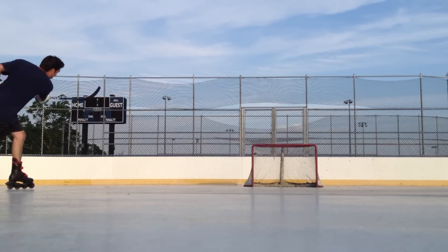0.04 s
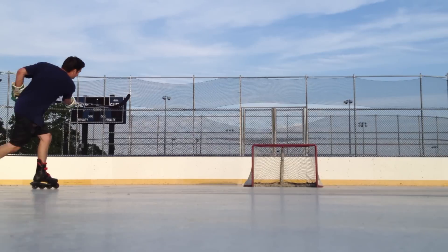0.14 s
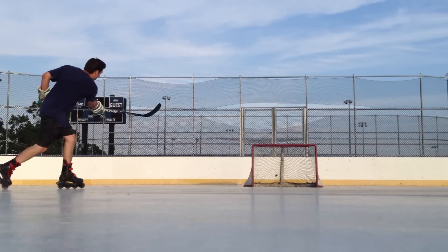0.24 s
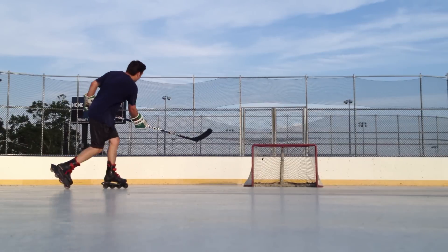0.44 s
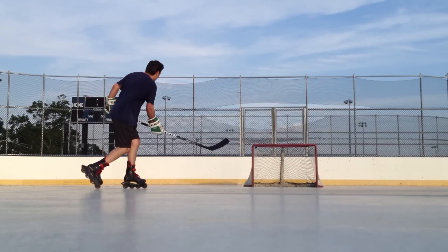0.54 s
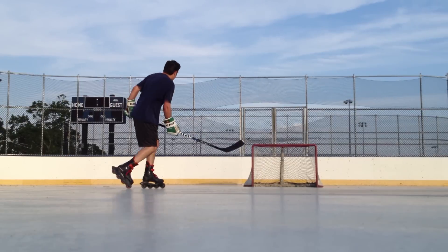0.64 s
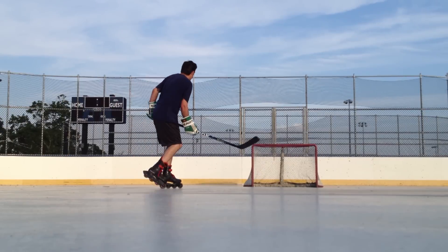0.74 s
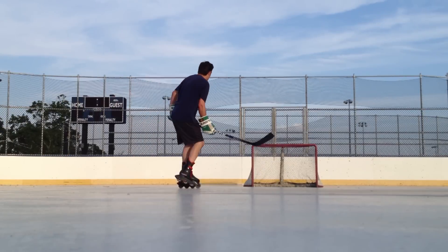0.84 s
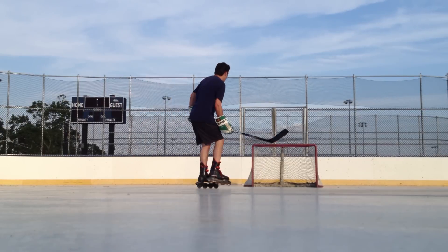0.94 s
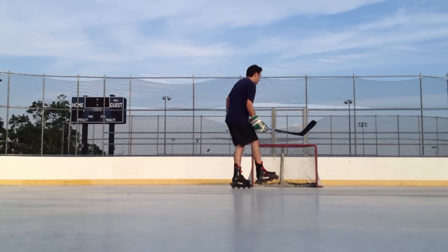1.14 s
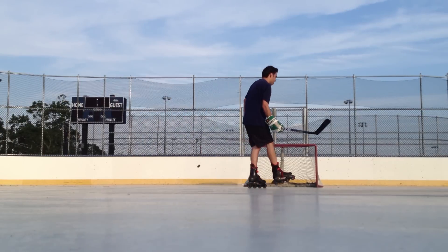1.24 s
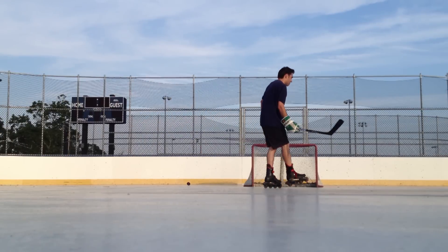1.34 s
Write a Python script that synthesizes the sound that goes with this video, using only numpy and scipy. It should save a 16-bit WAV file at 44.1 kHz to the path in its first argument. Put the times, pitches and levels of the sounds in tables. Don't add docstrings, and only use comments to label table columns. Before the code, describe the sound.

Sharp metallic clang of a puck striking a goal post, with board echoes fading over faint traffic

```python
import sys
import numpy as np
from scipy import signal
from scipy.io import wavfile

SR = 44100
rng = np.random.default_rng(int(sys.argv[2]) if len(sys.argv) > 2 else 0)


def output_pcm(signal):
    pcm = np.clip(np.atleast_2d(signal).T, -1, 1) * 32767
    wavfile.write(sys.argv[1], SR, np.round(pcm).astype(np.int16))


def magnitude_from_level(level_db):
    exponent = np.asarray(level_db, float) / 20
    return 10 ** exponent


N = 61739


def post():
    blow_s = [
        .2451,
        .2463,
        .2468,
    ]
    blow_db = [
        -18,
        -9,
        -8,
    ]
    blow = clicks(blow_s, blow_db)
    main_contact = clicks(blow_s[1:2], [0])
    rebound_push = -clicks(blow_s[2:], [15.5])
    struck = tubes(main_contact) + crack(blow, rebound_push) + crack_echo(main_contact)
    return filtered(struck, 2, 200, "high")


def tubes(contact):
    post_hz = [903, 950, 1147, 1485, 1805, 1922, 2003, 2190, 2259, 2552, 2633, 3102, 3305, 5846]
    # level_db, t60_s
    post_modes = [(0, .22), (0, .25), (-5, .3), (-1, .2), (1, .25), (-1, .2), (1, .25), (-6, .2), (-7, .18),
                  (-8, .2), (-6, .22), (-11, .15), (-9, .22), (-19, .18)]
    bar_hz = [1440, 1594, 2128, 2310, 2774, 3145, 3876, 4150, 6191, 6600, 7257, 7806]
    # level_db, t60_s
    bar_modes = [(-9, .2), (-11, .2), (-9, .15), (-7, .18), (-11, .14), (-9, .18), (-15, .14), (-16, .08),
                 (-21, .12), (-20, .04), (-25, .12), (-24, .12)]
    direct_db, tube_db = 3, -34
    heard = magnitude_from_level(direct_db) * contact + rink(contact, [(100, 0.0045), (15500, 0)])
    total = np.zeros(N)
    for hz, (db, t60) in zip(post_hz + bar_hz, post_modes + bar_modes):
        total += magnitude_from_level(tube_db + db) * rms_one(ring(heard, hz, t60))
    return filtered(total, 2, 600, "high")


def crack(blow, push):
    # freq_hz, level_db
    burst_colour = [
        (100, -46),
        (300, -15),
        (700, -1),
        (1100, -9),
        (2400, -16),
        (3000, 5),
        (6500, -8),
        (15500, -40),
    ]
    burst_t60_s, burst_db, snap_db = 0.0042, 8, -32
    noise = rms_one(bands(lambda hz: magnitude_from_level(at_hz(burst_colour, hz))))
    burst = noise * magnitude_from_level(-60 * np.arange(N) / SR / burst_t60_s)
    snap = filtered(blow, 2, 5000, "low")
    thump = filtered(push, 2, 970, "low")
    return magnitude_from_level(snap_db) * snap + thump + magnitude_from_level(burst_db) * signal.fftconvolve(blow, burst)[:N]


def crack_echo(contact):
    # freq_hz, level_db
    echo_colour = [
        (200, -18),
        (500, -8),
        (850, -4),
        (1300, -0.5),
        (2400, 0),
        (3000, -6.5),
        (6500, -14.5),
        (15500, -50),
    ]
    return magnitude_from_level(20.5) * rink(contact, echo_colour)


def rink(x, colour):
    # delay_s, rise_s, fall_t60_s, level_db
    boards = [
        (.002, 0.0021, 0.36, -24.5),
        (0.033, 0.011, 0.43, -25),
        (.17, 0.039, 1, -45),
        (0.328, 0.043, 0.94, -48),
        (.66, 0.023, 1, -62.5),
    ]
    # freq_hz, loss_db_per_s
    air = [
        (150, 7),
        (500, 10.5),
        (1200, -1.5),
        (2600, -0.5),
        (3300, 9),
        (6500, 34),
        (12000, 64),
    ]
    t = np.arange(N) / SR
    power = np.zeros(N)
    for delay, rise, t60, db in boards:
        fall_db = 120 * np.maximum(t - delay - rise, 0) / t60
        power += magnitude_from_level(2 * db - fall_db) * np.clip((t - delay) / rise, 0, 1) ** 2
    scatter = bands(lambda hz: magnitude_from_level(at_hz(colour, hz) - at_hz(air, hz) * t))
    scatter = scatter * magnitude_from_level(1 * drift(120))
    return signal.fftconvolve(x, np.sqrt(power) * scatter)[:N]


def shot_echo():
    # time_s, level_db
    slap_tail = [
        (0, -39),
        (.03, -46),
        (0.053, -46),
        (.06, -40),
        (.075, -45.5),
        (.11, -41.5),
        (.13, -43),
        (.19, -47),
        (.225, -44),
    ]
    # freq_hz, level_db
    slap_colour = [
        (200, -42),
        (330, -11),
        (600, 6),
        (1200, 15.5),
        (2200, 13),
        (4000, 5),
        (8000, -9),
        (15500, -21),
    ]
    t60_s = 3.6
    t = np.arange(N) / SR
    tail_s, tail_db = np.transpose(slap_tail)
    level_db = np.interp(t, tail_s, tail_db) - 60 * np.maximum(t - tail_s[-1], 0) / t60_s
    noise = rms_one(bands(lambda hz: magnitude_from_level(at_hz(slap_colour, hz) + 1.0 * drift(25))))
    slap = magnitude_from_level(level_db + 2 * drift(250)) * noise
    return filtered(slap, 3, 300, "high")


def ticks():
    # start_s, peak_db
    tick_list = [(0.0014, -33.5), (0.0244, -36), (0.0588, -36), (0.0977, -33), (0.1154, -37), (0.1744, -57),
                 (0.3564, -24), (0.4234, -25), (0.4644, -44), (0.7024, -46), (0.7148, -40), (1.1707, -62),
                 (1.2181, -67.5), (1.3094, -42), (1.3344, -43)]
    t60_s, snaps_db = 0.037, -10
    hits = np.abs(clicks(*np.transpose(tick_list)))
    envelope = signal.lfilter([1], [1, -magnitude_from_level(-60 / (t60_s * SR))], hits)
    snaps = filtered(envelope * rng.standard_normal(N), 2, [2500, 10000], "band")
    thud = ring(clicks([0.062], [-44]), 328, 0.041)
    return magnitude_from_level(snaps_db) * snaps + thud


def traffic():
    # freq_hz, level_db
    hum_colour = [(40, -81), (130, -2), (200, -7), (400, -7), (900, -3.5), (2000, -8), (5000, -21),
                  (15500, -31)]
    hum = bands(lambda hz: magnitude_from_level(at_hz(hum_colour, hz) + 2 * drift(10)))
    return magnitude_from_level(-54) * rms_one(hum)


def ring(x, hz, t60):
    r, w = magnitude_from_level(-60 / (t60 * SR)), 2 * np.pi * hz / SR
    return signal.lfilter([0, np.sin(w)], [1, -2 * r * np.cos(w), r * r], x)


def clicks(s, db):
    out = np.full(N, 1e-18)
    out[(np.array(s) * SR).astype(int)] = magnitude_from_level(np.array(db)) * (-1) ** np.arange(len(s))
    return out


def bands(gain):
    edges_hz = 35 * 2 ** np.arange(0, 9.1, 1 / 3)
    white = rng.standard_normal((2, N))
    total = np.zeros(N)
    for k, (lo, hi) in enumerate(zip(edges_hz, edges_hz[1:])):
        total += gain(np.sqrt(lo * hi)) * filtered(white[k % 2], 2, [lo, hi], "band")
    return total


def drift(rate):
    r = np.exp(-2 * np.pi * rate / SR)
    wander = signal.lfilter([1], [1, -2 * r, r * r], rng.standard_normal(N + 9000))
    return rms_one(wander[9000:])


def filtered(x, order, hz, kind):
    return signal.sosfilt(signal.butter(order, hz, kind, fs=SR, output="sos"), x)


def at_hz(points, hz):
    freq_hz, level_db = np.array(points).T
    return np.interp(np.log(hz), np.log(freq_hz), level_db)


def rms_one(x):
    return x / np.sqrt(np.mean(x ** 2) + 1e-20)


def scene():
    return (post() + shot_echo() + ticks() + traffic())[None]


def top_cut(x):
    return signal.sosfilt(signal.butter(12, 16050, fs=SR, output="sos"), x)


def record(dry):
    mic_hz = [5200, 6400, 9700, 12000, 13700]
    # width_hz, level_db
    mic_shape = [
        (690, -5.5),
        (870, 2.5),
        (880, -23),
        (2000, -9),
        (600, -15),
    ]
    ceiling = 1.3
    x = ceiling * np.tanh(dry / ceiling)
    for hz, (width_hz, db) in zip(mic_hz, mic_shape):
        a, w, g = np.pi * width_hz / SR, 2 * np.pi * hz / SR, magnitude_from_level(db / 2)
        x = signal.lfilter([1 + a * g, -2 * np.cos(w), 1 - a * g],
                           [1 + a / g, -2 * np.cos(w), 1 - a / g], x)
    x = filtered(x, 2, 110, "high")
    x = filtered(x, 8, 14300, "low")
    return top_cut(x)


dry = scene()
out = record(dry)
output_pcm(out)
```